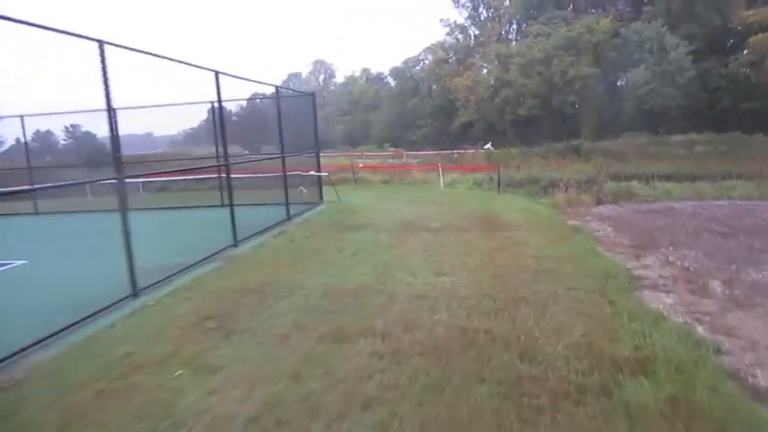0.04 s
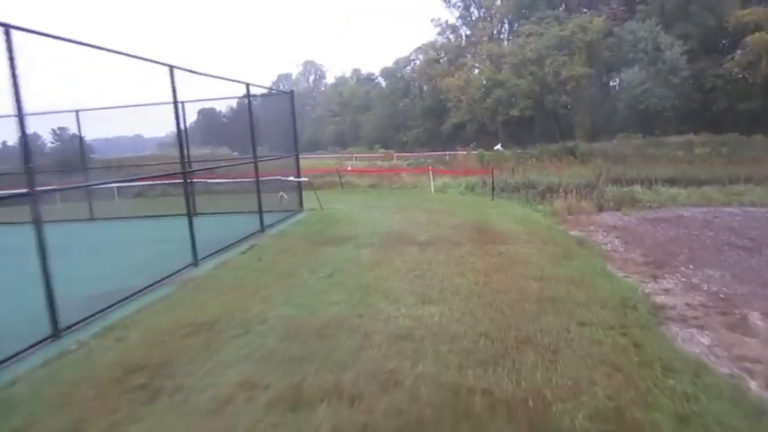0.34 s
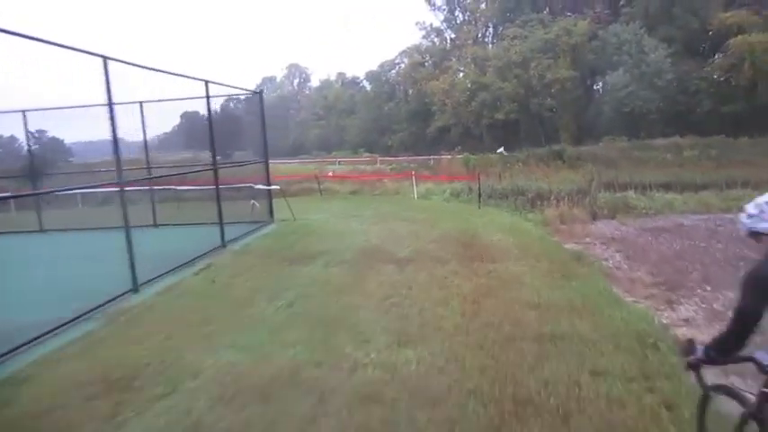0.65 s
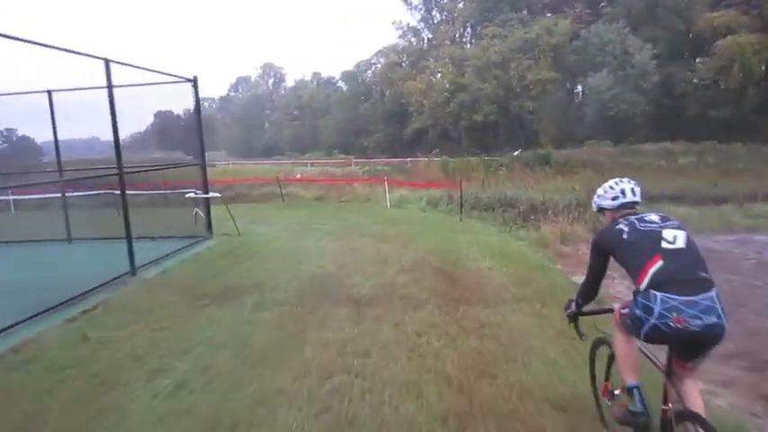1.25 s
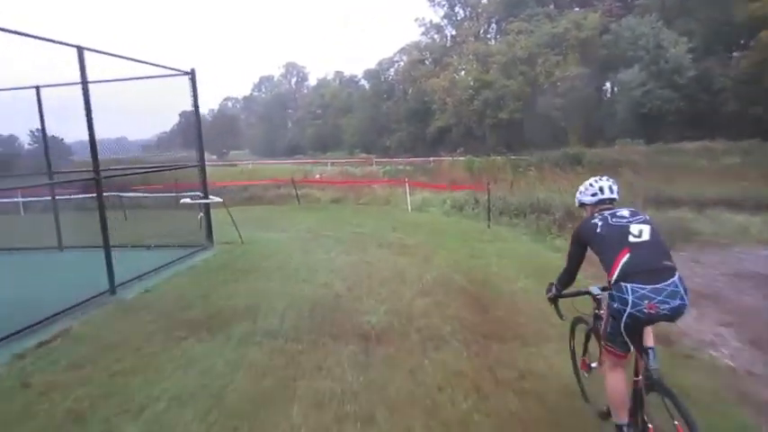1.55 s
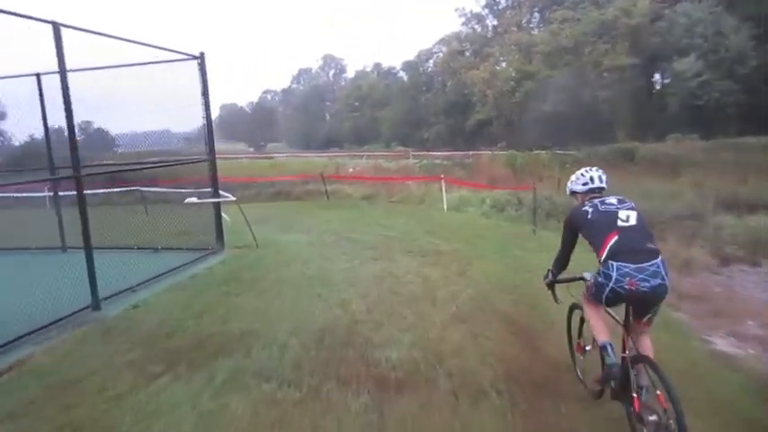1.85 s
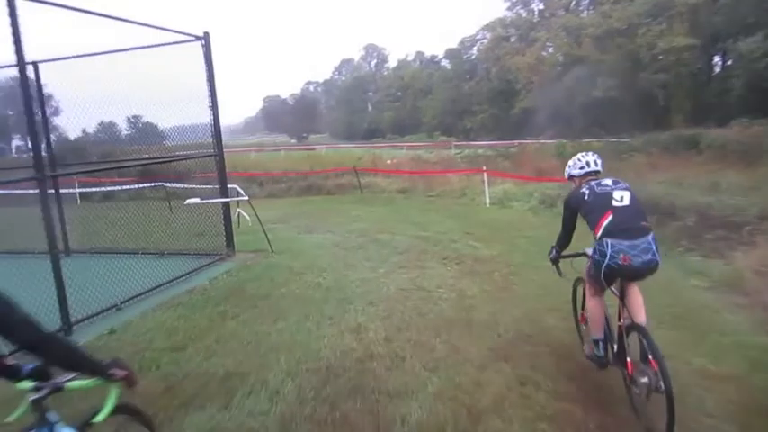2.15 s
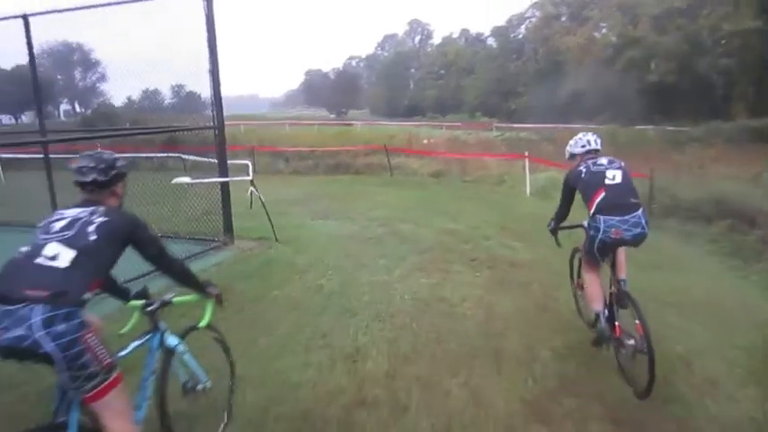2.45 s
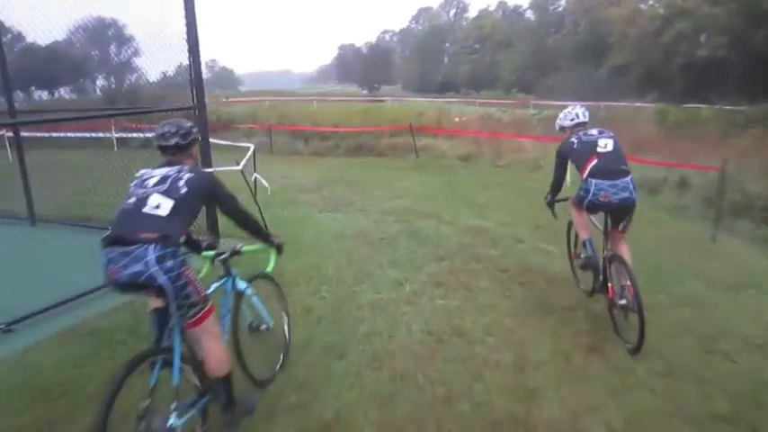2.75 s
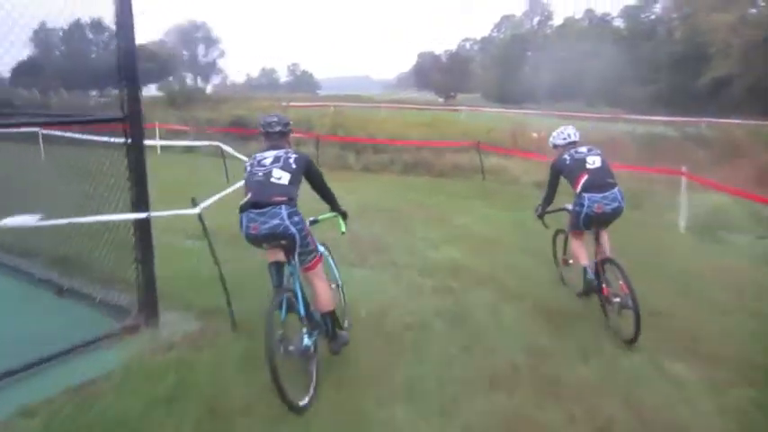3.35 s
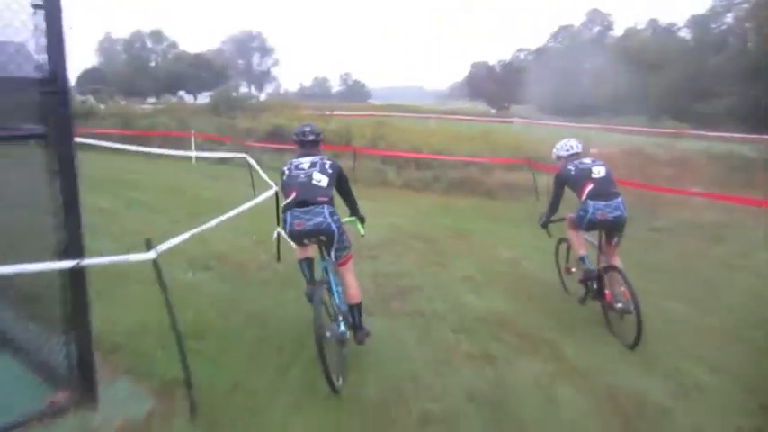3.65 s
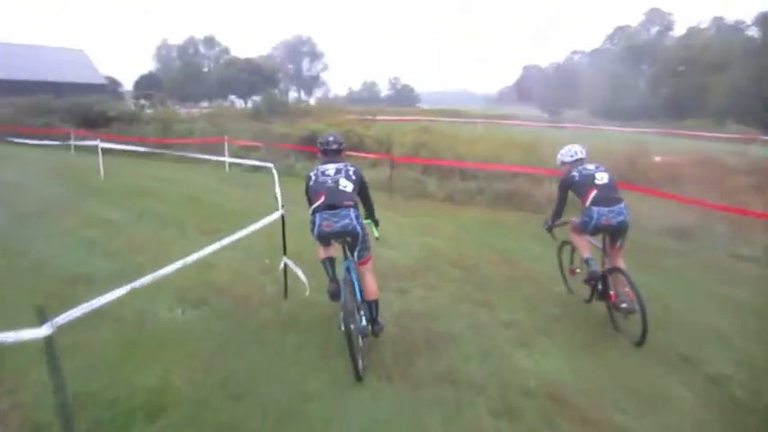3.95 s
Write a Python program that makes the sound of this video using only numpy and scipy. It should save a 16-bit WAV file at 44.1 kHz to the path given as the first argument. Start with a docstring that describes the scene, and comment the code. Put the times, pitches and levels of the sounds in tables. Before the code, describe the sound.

Lumpy rumble of a bicycle riding on grass, rattling as its freewheel starts ticking.

```python
"""A lumpy rumble opens the scene: a bicycle on a bumpy grass course, heard from a microphone mounted on it.
Wind and uneven ground force the mount into vibration, and hard bumps excite its low modes.
The tyres swish by friction with the grass; impacts set a loose part and the frame ringing.
After a second a freewheel starts ticking as the riders coast into a bend.
Faint whines come and go, the last a thin one near the end."""
import sys
import numpy as np
from scipy import signal
from scipy.fft import rfft, irfft
from scipy.io import wavfile
from scipy.ndimage import uniform_filter1d

SR = 44100
rng = np.random.default_rng(int(sys.argv[2]) if len(sys.argv) > 2 else 0)


def store_wav(level_fs):
    """Save 16-bit WAV to argv[1]."""
    pcm = np.round(np.clip(np.atleast_2d(level_fs), -1, 1) * 32767)
    wavfile.write(sys.argv[1], SR, pcm.T.astype(np.int16))


N = 176400
T = np.arange(N) / SR

# Table levels are relative; spectra give power per hertz.
# deep wind buffeting: time_s, level_db
GUST_LEVEL = [(0.0, -49), (0.51, -42.5), (0.59, -33), (1.22, -49.5), (1.61, -37.5), (2.05, -37.5),
              (2.08, -32.5), (2.36, -41.5), (2.38, -56.5), (3.0, -34.5), (3.04, -48), (3.13, -32),
              (3.48, -38.5), (3.58, -51.5), (4.0, -51.5)]
# spectrum of the gusts: frequency_hz, density_db
GUST_SPECTRUM = [(20,-40),(50,-20),(80,-5.5),(125,-2),(175,-4),(230,-26),(400,-39),(2000,-120)]
# steady road noise: time_s, level_db
ROAD_LEVEL = [(0,-40.5),(3.5,-37),(4,-33)]
# its spectrum: frequency_hz, density_db
ROAD_SPECTRUM = [(20,-40),(70,-4),(150,3.5),(280,-1.5),(450,-10.5),(900,-26),(8000,-92.5)]
# faint squeals: start_s, end_s, pitch_hz, level_db, wander_hz
WHINES = [(0.42,0.85,2410,-57,45),(1.06,1.43,536,-39,2),(2.85,4.1,1895,-56.5,4)]
# tyres in the grass: time_s, level_db
SWISH_LEVEL = [(0.0, -56.5), (1.02, -56), (1.45, -52.5), (3.3, -54.5), (4.0, -56)]
# their spectrum: frequency_hz, density_db
SWISH_SPECTRUM = [(150,1),(400,-0.5),(900,-3.5),(1400,-9.5),(2400,-12.5),(3300,-21.5),(5000,-23),(6500,-33),(9000,-39.5),(12000,-55.5)]

# pawls of the coasting freewheel: time_s, ticks_per_s
TICK_RATE = [(1.1, 24.2), (1.4, 70.0), (1.55, 63.2), (1.7, 54.6), (1.9, 61.2), (2.1, 58.6), (2.42, 54.9),
             (2.52, 62.7), (2.75, 56.7), (2.95, 50.7), (3.2, 57.7), (3.4, 49.9), (3.6, 52.8), (4.0, 49.5)]
# strength of the ticking: time_s, level_db
TICK_LEVEL = [(0.9,-93),(1.15,-67.5),(1.3,-61),(1.45,-57.5),(2.1,-57.5),(2.7,-55),(2.9,-59.5),(3.6,-61),(4,-59.5)]
# spectrum of a tick: frequency_hz, density_db
TICK_SPECTRUM = [(1200,-11.5),(2200,-0.5),(3300,-3.5),(4500,-2),(6500,-4),(7600,-9.5),(9300,-12),(10500,-24),(12000,-30.5),(15000,-22.5)]
# the ticks blur into hiss as the riders move on: time_s, hiss_to_tick_power_ratio
TICK_HISS = [(2.7,.1),(3.55,.3),(3.72,1.1),(4,.5)]
# the metallic ring shifts as the riders pass: time_s, pitch_hz
HUB_RESONANCE = [(2.3,5100),(2.42,4450),(2.55,4550),(2.62,6100),(2.76,6100),(2.9,4600)]

# the loose part strikes its hard stop: start_s, level_db
CLACKS = [(0.1646, -43.5), (0.3339, -35.5), (0.4953, -36), (0.6311, -37.5), (0.846, -39), (0.9743, -40.5),
          (1.0575, -33.5), (1.3487, -37.5), (1.5354, -30), (1.6336, -31.5), (1.7725, -39.5),
          (2.1252, -28.5), (2.341, -35.5), (2.4426, -39.5), (3.057, -36.5), (3.2733, -36), (3.5647, -36.5),
          (3.865, -37.5)]
# modes of a clack: pitch_hz, gain_db, t60_s
CLACK_MODES = [(2020,-10,0.01),(2730,-6.5,0.008),(3570,2,0.0043),(4190,-3,0.009),(5180,-3,0.012),(6900,-13.5,0.0021),(8160,-16,0.01),(9360,-12,0.011),(14600,-16.5,.004)]
# the part falls back with a duller tap: start_s, level_db
TAPS = [(0.061, -42.5), (0.3018, -42), (0.378, -44), (0.7099, -41.5), (1.6002, -40), (1.6636, -36),
        (2.0081, -43), (2.0719, -38), (2.2602, -42), (2.3719, -40.5), (2.7712, -39), (3.903, -38)]
# modes of a tap: pitch_hz, gain_db, t60_s
TAP_MODES = [(2410,-2.5,0.007),(3370,-6.5,0.0052),(4150,-3.5,0.0087),(5330,-17,.004)]
# hollow knocks in the frame: start_s, level_db
KNOCKS = [(0.827, -32), (1.3454, -34.5), (2.327, -36), (2.37, -36), (3.2894, -31), (3.3076, -32),
          (3.7454, -43.5)]
# modes of the frame: pitch_hz, gain_db, t60_s
FRAME_MODES = [(730,-6.5,.012),(960,1,0.013),(1400,-7,0.015),(1800,-4.5,0.0031)]

# hard bumps in the ground: start_s, level_db
BUMPS = [(0.059, -22), (0.387, -13.5), (0.42, -18.5), (0.643, -14), (0.675, -12.5), (0.753, -11.5),
         (0.859, -11), (1.111, -18), (1.341, -20), (1.502, -14), (1.541, -13), (1.556, -18), (1.594, -13.5),
         (1.639, -13), (1.667, -21), (1.787, -20), (1.845, -17), (2.071, -15.5), (2.097, -14.5),
         (2.134, -12.5), (2.257, -11), (2.53, -16), (2.674, -27), (2.732, -9), (2.855, -19), (3.083, -16.5),
         (3.138, -16), (3.249, -14), (3.284, -8.5), (3.385, -15.5), (3.436, -22), (3.462, -19),
         (3.496, -16.5)]
# low modes of the mount: pitch_hz, gain_db, t60_s
MOUNT_MODES = [(173.7, 0, 0.048), (250.8, 1, 0.087), (345.6, -1, 0.051), (485, -7, 0.055),
               (684, -12.5, .025), (980, -21.5, 0.026)]
# shaking by wind and ground: time_s, level_db
SHAKE_LEVEL = [(0.0, -30), (0.35, -31), (0.39, -27.5), (0.5, -32), (0.53, -28.5), (0.84, -29.5),
               (0.89, -46), (0.92, -28), (0.99, -40.5), (1.01, -30.5), (1.06, -35.5), (1.12, -27),
               (1.19, -39), (1.39, -38.5), (1.44, -33), (1.94, -28), (1.98, -38), (2.08, -27.5),
               (2.27, -28), (2.32, -39), (2.49, -43), (2.53, -30), (2.63, -37), (2.68, -26), (2.89, -36.5),
               (2.92, -28), (3.04, -36), (3.16, -28), (3.22, -33.5), (3.4, -27), (3.53, -29.5), (3.55, -42),
               (4.0, -53.5)]
# spectrum of the shaken mount at speed ratio 1: frequency_hz, density_db
MOUNT_SPECTRUM = [(60,-24.5),(120,-9.5),(185,0),(255,1),(330,-4),(420,-10),(560,-19),(800,-32),(1400,-46),(2200,-73.5)]
# the bicycle slows for the bend: time_s, speed_ratio
SPEED = [(0,1.09),(1.6,1.1),(2.1,0.9),(3.4,.96)]

# right channel against the left: attenuation_db, incoherent_power_share
MOUNT_RIGHT, GRASS_RIGHT, HUB_RIGHT = (6.63, 0.011), (8.1, 0.66), (11.4, 0.42)
RATTLE_RIGHT, ROAD_RIGHT = (15, 0.35), (-4.5, 0.34)


def from_db(db):
    """Amplitude ratio: a factor of ten per 20 dB."""
    return 10 ** (np.asarray(db) / 20)


def in_time(rows):
    """Linear interpolation of a time curve at every sample."""
    return np.interp(T, *np.transpose(rows))


def noise():
    """Two incoherent white noises."""
    return rng.standard_normal((2, N))


def drift(corner_hz):
    """Slow random modulation: low-passed noise of rms 1."""
    step = 40  # samples per random value
    pole = np.exp(-2 * np.pi * corner_hz * step / SR)
    slow = signal.lfilter([1], [1, -2 * pole, pole * pole], rng.standard_normal(N // step + 2002))[2000:]
    slow /= np.sqrt(np.mean(slow ** 2) + 1e-20)
    return np.interp(np.arange(N) / step, np.arange(len(slow)), slow)


def coloured(pair, spectrum, size=8192):
    """Minimum-phase filtering to the given spectrum, at unit power gain."""
    hz, db = np.transpose(spectrum)
    log_hz = np.log(np.fft.rfftfreq(size, 1 / SR) + 1)
    magnitude = from_db(np.interp(log_hz, np.log(hz), db))
    cepstrum = irfft(np.log(magnitude))
    cepstrum[1:size // 2] *= 2  # folding the cepstrum makes the response causal
    cepstrum[size // 2 + 1:] = 0
    response = irfft(np.exp(rfft(cepstrum)))[:size // 2]
    return signal.fftconvolve(pair, response[None] / np.linalg.norm(response), axes=1)[:, :N]


def lowpass(x, hz, order):
    """Butterworth low-pass: maximally flat below the cutoff."""
    return signal.sosfilt(signal.butter(order, hz, fs=SR, output="sos"), x)


def evened(pair, span_s=0.068):
    """Division by the first signal's running rms steadies its level but keeps fast fluctuations."""
    return pair / np.sqrt(uniform_filter1d(pair[0] ** 2, int(span_s * SR)) + 1e-9)


def bursts(start_s, level_db, decay_s):
    """Critically damped power envelope: each contact swells and dies away, with energy 1 at 0 dB."""
    impulses = np.zeros(N)
    np.add.at(impulses, np.clip((start_s * SR).astype(int), 0, N - 1), from_db(level_db) ** 2)
    pole = np.exp(-1 / (decay_s * SR))
    return signal.lfilter([(1 - pole) ** 2], [1, -2 * pole, pole * pole], impulses + 1e-18)


def ring(force, hz, t60_s):
    """Damped harmonic oscillator: a unit impulse starts a decaying sine of amplitude 1."""
    radius, angle = from_db(-60 / (t60_s * SR)), 2 * np.pi * hz / SR
    return signal.lfilter([0, np.sin(angle)], [1, -2 * radius * np.cos(angle), radius * radius], force)


def stereo(pair, balance):
    """Partial coherence: the first signal goes left; the right mixes its inverse with the second."""
    attenuation_db, share = balance
    right = np.sqrt(share) * pair[1] - np.sqrt(1 - share) * pair[0]
    return np.array([pair[0], from_db(-attenuation_db) * right])


def wind(gain_db=13.5):
    """Pressure fluctuations of gusts push on the microphone as deep noise."""
    gusts = evened(coloured(noise(), GUST_SPECTRUM))
    return stereo(from_db(gain_db + in_time(GUST_LEVEL)) * gusts, MOUNT_RIGHT)


def road():
    """Broadband road noise, with most power at low frequencies, swells slowly under the gusts."""
    return stereo(from_db(in_time(ROAD_LEVEL)) * coloured(noise(), ROAD_SPECTRUM), ROAD_RIGHT)


def whines(fade_s=0.12, waver_depth=0.22):
    """Random frequency and amplitude modulation makes thin tones waver, like rubbing brakes."""
    tones = np.zeros(N)
    for start_s, end_s, pitch_hz, level_db, wander_hz in WHINES:
        fade = np.clip(np.minimum(T - start_s, end_s - T) / fade_s, 0, 1)
        phase = 2 * np.pi * np.cumsum(pitch_hz + wander_hz * drift(30)) / SR
        tones += from_db(level_db) * fade * (1 + waver_depth * drift(15)) * np.sin(phase)
    return stereo([tones, np.zeros(N)], HUB_RIGHT)


def tyres(gain_db=11.5, roughness_db=1.6):
    """Friction noise: blades of grass brush the tyres in a fine, uneven swish."""
    brushing = noise() * from_db(roughness_db * drift(70))
    swish = coloured(brushing, SWISH_SPECTRUM)
    return stereo(from_db(gain_db + in_time(SWISH_LEVEL)) * swish, GRASS_RIGHT)


def freewheel(jitter_s=0.00037, spread_db=1.8, ring_width_hz=400, ring_db=-1):
    """An impact train: each tooth drops the pawls in a gritty tick that resonates in the hub."""
    rate = in_time(TICK_RATE)
    teeth_passed = np.floor(np.cumsum(rate * (T > TICK_RATE[0][0])) / SR)
    tick_s = T[1:][np.diff(teeth_passed) > 0]
    timing, strength = rng.standard_normal((400, 2))[:len(tick_s)].T
    power = bursts(tick_s + jitter_s * timing, spread_db * strength, decay_s=0.0013) * SR / rate
    grit = noise() * np.sqrt(power + in_time(TICK_HISS))
    ticks = from_db(in_time(TICK_LEVEL)) * coloured(grit, TICK_SPECTRUM)
    # a moving band-pass: shift the resonance to 0 Hz, low-pass, shift back
    carrier = np.exp(2j * np.pi * np.cumsum(in_time(HUB_RESONANCE)) / SR)
    ringing = 2 * np.real(carrier * lowpass(ticks / carrier, ring_width_hz / 2, order=1))
    return stereo(ticks + from_db(ring_db) * ringing, HUB_RIGHT)


def rattle(hits, modes, gain_db):
    """Modal superposition: brief chattering contacts drive a part's modes in alternating polarity."""
    start_s, level_db = np.transpose(hits)
    contact = np.sqrt(bursts(start_s, level_db + gain_db, decay_s=0.00083)) * noise()
    ringing = sum((-1) ** k * from_db(mode_db) * ring(contact, hz, t60_s)
                  for k, (hz, mode_db, t60_s) in enumerate(modes))
    return stereo(lowpass(ringing, hz=10400, order=2), RATTLE_RIGHT)


def bumps(gain_db=6.5, rise_s=0.002, pitch_spread=0.1, spread_db=2):
    """Free vibration: each hard bump leaves the mount's low modes decaying, slightly retuned each time."""
    hz, mode_db, t60_s = np.transpose(MOUNT_MODES)[:, :, None]
    t, thumps = T[:SR // 10], np.zeros(N)
    attack = 1 - np.exp(-(t / rise_s) ** 2)
    decay = np.exp(-np.log(1000) * t / t60_s)
    for start_s, level_db in BUMPS:
        detune, strength = rng.standard_normal((2, len(hz), 1))
        cycles = hz * (1 + pitch_spread * detune) * t + rng.random(hz.shape)
        modes = from_db(mode_db + spread_db * strength) * decay * np.sin(2 * np.pi * cycles)
        thump = attack * modes.sum(axis=0)
        thumps[int(start_s * SR):][:len(t)] += from_db(level_db + gain_db) * thump / np.abs(thump).max()
    return stereo([thumps, np.zeros(N)], MOUNT_RIGHT)


def rumble(gain_db=12, lump_db=4, treble_db_per_db=0.88, neutral_shake_db=-31):
    """Forced vibration of the mount: harder shaking sounds brighter, slower riding deeper."""
    shake_db = in_time(SHAKE_LEVEL)
    force = noise() * from_db(lump_db * drift(73))
    vibration = evened(coloured(force, MOUNT_SPECTRUM))
    travelled = np.cumsum(in_time(SPEED)) / SR  # reading along the path scales frequency with speed
    vibration = np.array([np.interp(travelled % T[-1], T, side) for side in vibration])
    bass = lowpass(vibration, hz=346, order=1)
    treble = (vibration - bass) * from_db(treble_db_per_db * (shake_db - neutral_shake_db))
    shaken = from_db(gain_db + shake_db) * (bass + treble)
    return stereo(lowpass(shaken, hz=2000, order=4), MOUNT_RIGHT)


def scene():
    """Linear superposition of all sources at the mounted microphone."""
    loose_part = rattle(CLACKS, CLACK_MODES, gain_db=2.5) + rattle(TAPS, TAP_MODES, gain_db=10)
    frame = rumble() + bumps() + rattle(KNOCKS, FRAME_MODES, gain_db=6)
    return wind() + road() + tyres() + freewheel() + whines() + loose_part + frame


def record(dry, cutoff_hz=15900):
    """Soft saturation rounds the highest peaks; a steep elliptic low-pass limits the bandwidth."""
    rounded = dry / (1 + dry ** 8) ** (1 / 8)
    return signal.sosfilt(signal.ellip(10, 0.1, 80, cutoff_hz, fs=SR, output="sos"), rounded)


dry = scene()
out = record(dry)
store_wav(out)
```